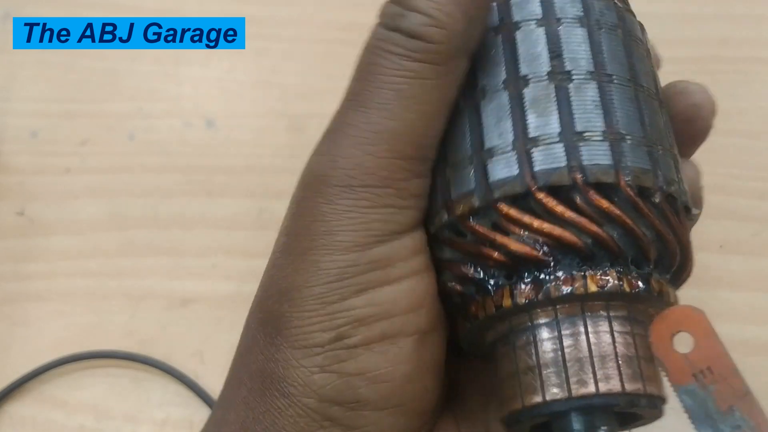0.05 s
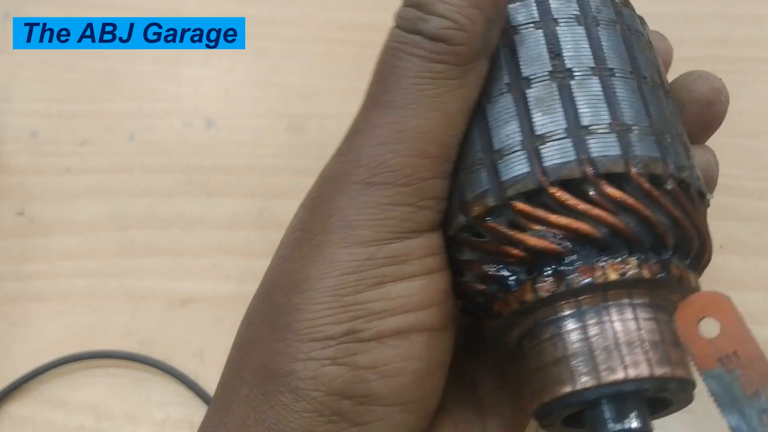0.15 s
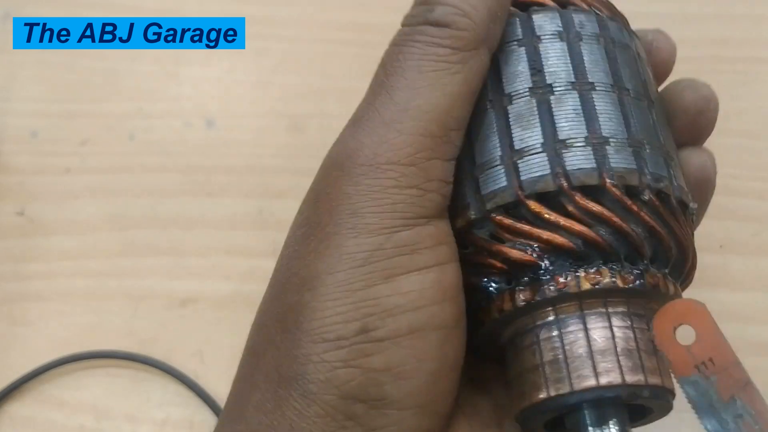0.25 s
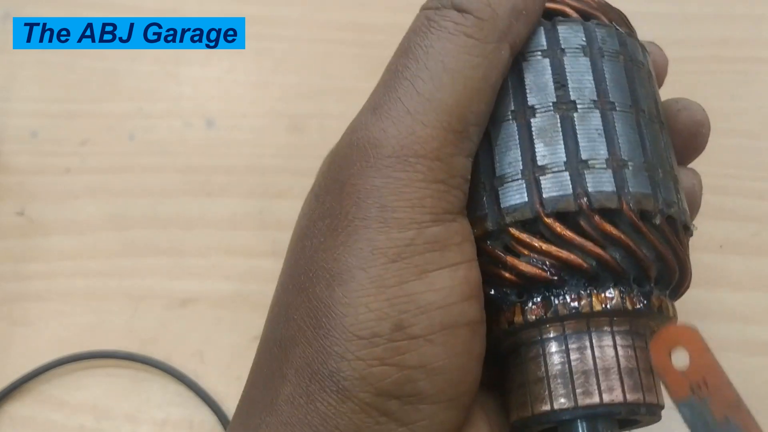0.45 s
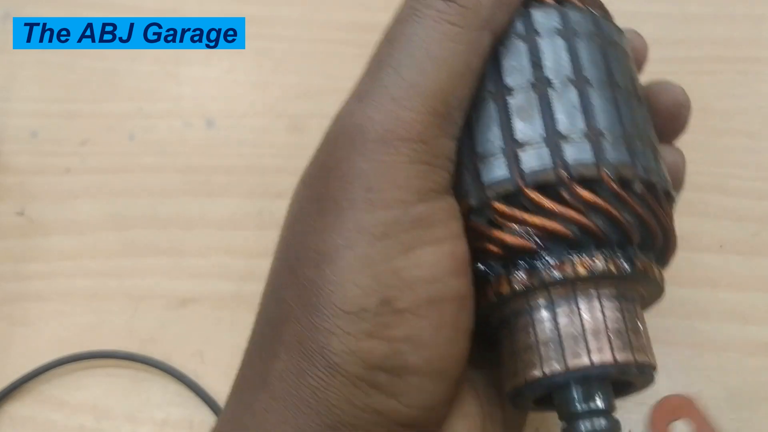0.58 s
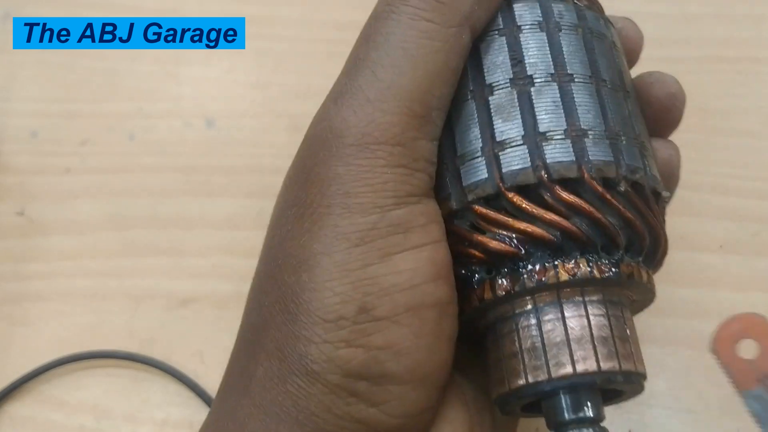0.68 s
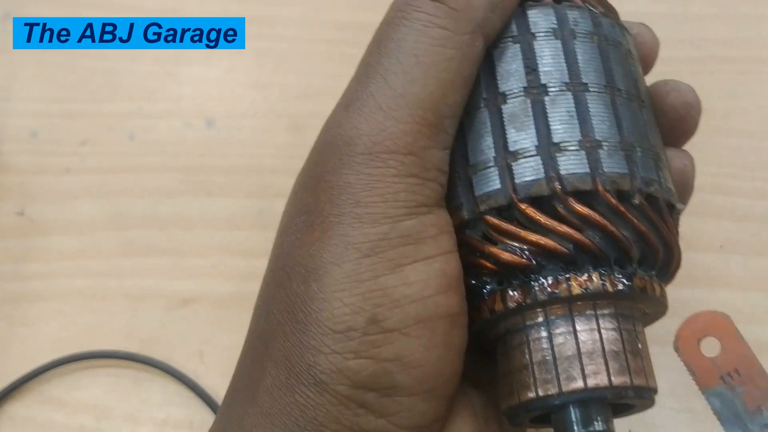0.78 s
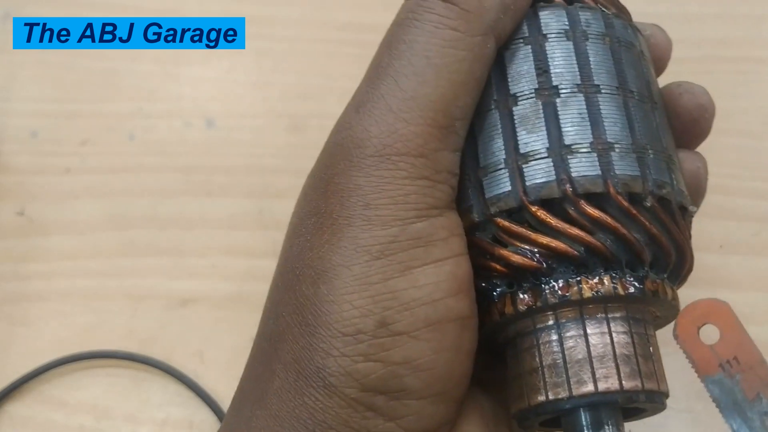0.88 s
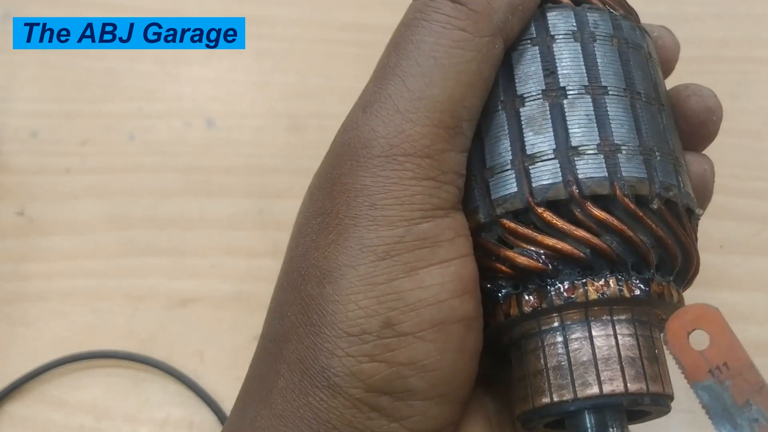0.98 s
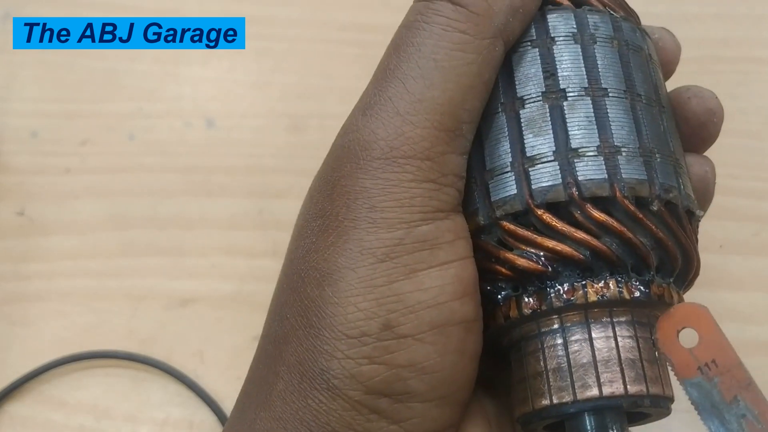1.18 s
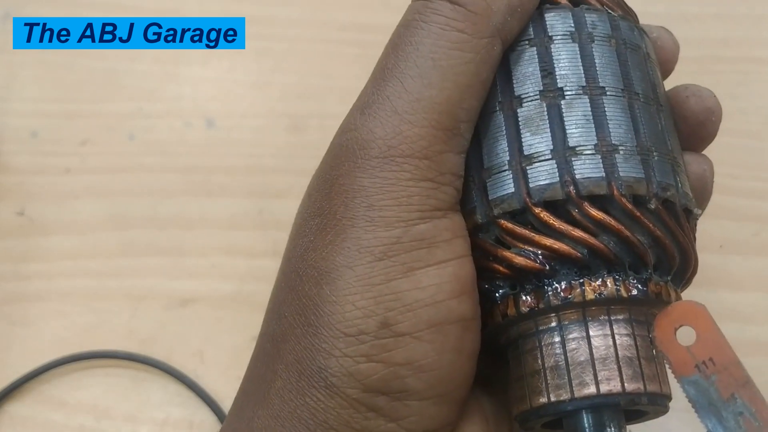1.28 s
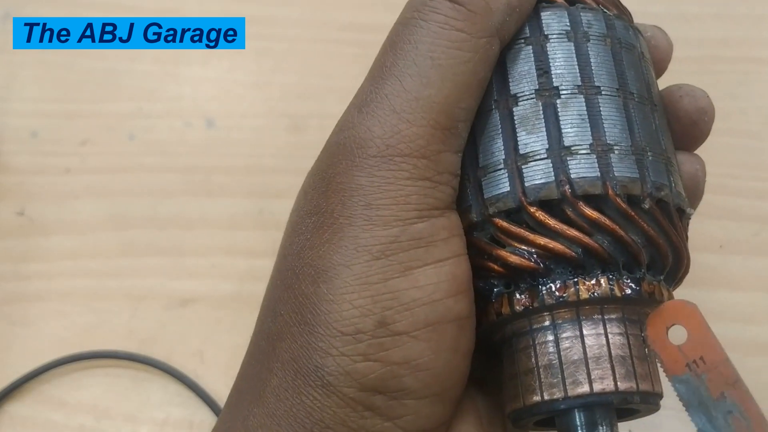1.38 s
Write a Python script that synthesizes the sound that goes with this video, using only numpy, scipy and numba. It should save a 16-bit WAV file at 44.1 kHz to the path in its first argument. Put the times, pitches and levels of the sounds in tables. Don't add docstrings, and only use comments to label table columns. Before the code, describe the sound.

Small blade scraping copper slots in brief scratchy strokes, clicking free, over soft rumbling air puffs.

```python
import sys
import numpy as np
from scipy import signal
from scipy.io import wavfile
from scipy.ndimage import uniform_filter1d
from numba import njit

SR = 44100
rng = np.random.default_rng(int(sys.argv[2]) if len(sys.argv) > 2 else 0)


def ratio(d):
    e = np.asarray(d, float) / 20
    return 10 ** e


def master_out(mix):
    frames = np.transpose(np.atleast_2d(mix))
    ceiling = np.clip(frames, -1, 1)
    pcm = np.round(ceiling * 32767).astype(np.int16)
    wavfile.write(sys.argv[1], SR, pcm)


N = 63945
OPPOSITE = np.array([[1], [-1]])


@njit
def svf(x, hz, width):
    y, band, low = np.empty(len(x)), 0., 0.
    g, k = np.tan(np.pi * hz / SR), width / hz
    for i in range(len(x)):
        v = (band + g * (x[i] - low)) / (1 + g * (g + k))
        band, low = 2 * v - band, low + 2 * g * v
        y[i] = k * v
    return y


def unit(x):
    return x / np.sqrt(np.mean(x ** 2))


def walk(rate_hz):
    hold = int(SR / rate_hz)
    steps = np.repeat(rng.standard_normal(N // hold + 1), hold)
    drift = uniform_filter1d(uniform_filter1d(steps, hold), hold)[:N]
    return unit(drift - drift.mean())


def ring(t, hz, ms):
    age = np.clip(t / (ms / 1000), 0, 40)
    return (age / 2) ** 2 * np.exp(2 - age) * np.sin(2 * np.pi * hz * t)


# centre in # seconds, length in seconds, level in dB.
SWELLS = [(.01, 0.054, -2.5), (0.056, 0.025, 10.5), (.315, 0.012, 6), (0.582, .03, 8), (0.705, 0.08, -2),
          (1.004, 0.024, -3), (0.094, 0.046, 4.5), (0.127, .03, 4), (0.193, 0.08, 13), (.26, 0.061, 9),
          (0.342, 0.036, 6), (.385, 0.045, 9), (0.5, 0.12, 13.5), (0.607, 0.045, 10.5), (0.641, 0.047, 6),
          (0.737, 0.015, 6.5), (0.785, 0.012, 8), (0.836, 0.028, 10.5), (0.943, 0.067, 10),
          (1.065, 0.069, 8), (1.109, 0.096, 10), (1.18, 0.038, 9), (1.25, 0.022, 5), (1.294, 0.02, 2.5),
          (1.368, 0.051, 8.5), (1.415, 0.019, 7.5), (1.447, 0.044, 6.5)]


def puff_swell(t):
    swells = [db * np.exp(-((t - s) / (length / 1.87)) ** 2) for s, length, db in SWELLS]
    return np.max(swells, axis=0) + np.min(swells, axis=0)


# frequency in Hz, level in dB.
AIR = [(15, -12), (30, 0.5), (309, -10), (591, -22.5), (1070, -26), (3400, -32.5), (4700, -41), (8000, -34),
       (16000, -30.5)]


def air(puff):
    air_db, shared_db, flicker_db = -58.5, 2.0, 1.6
    out, shared = 0, walk(44.84)
    table_hz, table_db = np.array(AIR).T
    for hz in 28 * 2 ** np.arange(0, 9.3, .5):
        mid, side = (svf(rng.standard_normal(N), hz, hz / 2.97) for _ in range(2))
        high = np.clip(np.log2(hz / 300) / 4, 0, 1)
        puff_share = 0.98 + high * (0.75 - 0.98)
        db = np.interp(np.log(hz), np.log(table_hz), table_db)
        db = db + puff_share * (puff + shared_db * shared)
        wide = np.clip((hz / 880) ** 0.94, 0.25, 1)
        out = out + ratio(db + flicker_db * walk(24.9)) * (mid + wide * side * OPPOSITE)
    out = out * ratio(air_db) / np.sqrt(np.mean(out ** 2 / ratio(2 * puff)))
    suction = 22
    slow = uniform_filter1d(out, size=60)
    return out - suction * (slow ** 2 - uniform_filter1d(slow ** 2, size=2000))


# frequency in Hz, width in Hz, level in dB.
HOUSING = [(3800, 72, -75.5), (5880, 320, -80.5), (3160, 100, -84.5), (2420, 130, -79), (1188, 41, -80.5),
           (759, 150, -72)]


def housing_whistle(puff):
    flicker_db = 2.5
    out = np.zeros((2, N))
    for hz, width, db in HOUSING:
        mid, side = (unit(svf(rng.standard_normal(N), float(hz), float(width))) for _ in range(2))
        level = ratio(db + 0.68 * puff + flicker_db * walk(29.97))
        out = out + level * (mid + 1.01 * side * OPPOSITE)
    return out


def bench_echo(blade):
    echo_db, t60_s = -45, 0.018
    lag = np.arange(6000) / SR
    tail = rng.standard_normal((2, len(lag))) * ratio(-60 * lag / t60_s) * (lag > .002)
    tail = tail / np.sqrt(np.sum(tail ** 2, axis=1, keepdims=True))
    return ratio(echo_db) * signal.fftconvolve(blade, tail, axes=1)[:, :N]


# time in seconds, right peak in dB, ring in Hz, ring time in ms.
TICKS = [(0.0357, -42.5, 2640, 0.27), (0.2052, -28, 3400, 0.28), (.21817, -11.5, 3650, 0.42),
         (0.2176, -27, 2460, 0.45), (0.2218, -24, 3960, 0.23), (0.2208, -21.5, 2440, 0.31),
         (0.2208, -6.5, 3800, .2), (0.2224, -17, 3800, 0.43), (0.4681, -32, 3000, 0.38),
         (0.4834, -32, 2480, 0.91), (0.4862, -30, 2640, 0.82), (0.4942, -30, 2530, 0.26),
         (0.5198, -29.5, 3320, 0.27), (0.5206, -21, 2630, 0.62), (0.5237, -24, 2610, 0.64),
         (0.5269, -22, 2800, 0.28), (.5277, -26, 3450, 0.32), (0.5294, -27, 2900, .4),
         (0.5321, -20, 2523, 0.66), (.5327, -25, 2650, 0.52), (0.534, -29.5, 3500, .4),
         (0.5374, -38, 2430, 0.54)]
# mode in Hz, left in dB, right in dB, share of the ring time.
TICK_PARTS = [(1210, -24.5, -28.5, 2.14), (1775, -30, -23, 1.7), (5660, -31, -20, 0.73),
              (6460, -28, -41, 0.49), (9500, -36, -38, 0.73), (12500, -34, -43, 0.59)]


def ticks(t):
    left_db, left_lead_s, left_ring_share, floor_hz = -7.5, .00002, 0.44, 1100
    out = np.zeros((2, N))
    for s, db, hz, ms in TICKS:
        i = slice(int(s * SR) - 20, int(s * SR) + 900)
        left_t, right_t = t[i] - s + left_lead_s, t[i] - s
        out[0, i] += ratio(db + left_db) * ring(left_t, hz, ms * left_ring_share)
        out[1, i] += ratio(db) * ring(right_t, hz, ms)
        for body_hz, body_left_db, body_right_db, share in TICK_PARTS:
            out[0, i] += ratio(db + body_left_db) * ring(left_t, body_hz, ms * share)
            out[1, i] += ratio(db + body_right_db) * ring(right_t, body_hz, ms * share)
    return signal.sosfiltfilt(signal.butter(3, floor_hz, "high", fs=SR, output="sos"), out)


def grit_clicks():
    per_s, spread_db = 6100, 3.0
    chance, sign, strength = rng.random((3, N))
    hits = (chance < per_s / SR) * np.sign(sign - .5)
    return unit(hits * ratio(-spread_db * np.log(strength + 1e-9)))


# start in seconds, end in seconds, level in dB,
# share of the stroke spent rising (0-1), ring of the low modes in dB.
STROKES = [
    (0.031, 0.062, -54.5, 0.13, -3.5),
    (0.146, .208, -43, 0.7, -3.5),
    (0.441, 0.534, -40, 0.49, 0.5),
]
# frequency in Hz, width in Hz, left in dB, right in dB.
BLADE = [(1166, 300, -15.5, -17), (2473, 130, -15.5, 0), (2695, 162, -20, 0.5), (3140, 340, -13.5, -4),
         (3500, 215, -21.5, -2.5), (3800, 240, -23, -8.5), (5400, 260, -10.5, -13.5), (6020, 500, -15, -10),
         (7020, 480, -12.5, -15.5), (8670, 1640, -10, -14), (11500, 3500, -11.5, -14)]


def scrape(t):
    release_s, chatter_db, low_modes_hz = 0.0098, 1.66, 2900
    push, low_push = 0, 0
    for start, end, db, rise, low_db in STROKES:
        full = start + np.clip(rise, .05, .95) * (end - start)
        pressure = np.interp(t, [start, full, end, end + release_s], [0, 1, 1, 0])
        shape = ratio(db) * pressure ** 1.15
        push = push + shape
        low_push = low_push + ratio(low_db) * shape
    chatter = ratio(chatter_db * walk(150.3))
    push, low_push = chatter * push, chatter * low_push
    shared, *own_grit = [grit_clicks() for _ in range(3)]
    out = np.zeros((2, N))
    for hz, width, left_db, right_db in BLADE:
        own = np.clip((hz - 3500) / 6000, .15, 1.0)
        drive = low_push if hz < low_modes_hz else push
        for ch, db in enumerate((left_db, right_db)):
            x = (shared + own * own_grit[ch]) / np.hypot(1, own) * drive
            for _ in range(2):
                x = svf(x, float(hz), 1.57 * width)
            out[ch] += ratio(db) * np.sqrt(SR / np.pi / width) * x
    return out


def scene():
    t = np.arange(N) / SR
    puff = puff_swell(t)
    blade = scrape(t) + ticks(t)
    return blade + bench_echo(blade) + air(puff) + housing_whistle(puff)


def low_pass(x):
    return signal.sosfilt(signal.butter(12, 16620, fs=SR, output="sos"), x)


def record(dry):
    top_hz = 15700
    mix = signal.sosfilt(signal.ellip(8, .2, 60, top_hz, fs=SR, output="sos"), dry)
    return low_pass(mix)


dry = scene()
out = record(dry)
master_out(out)
```